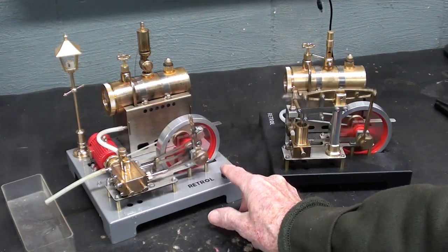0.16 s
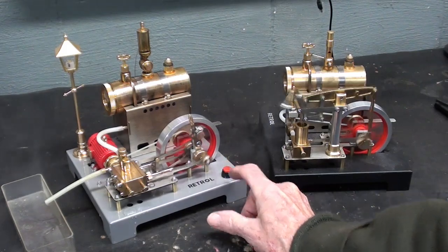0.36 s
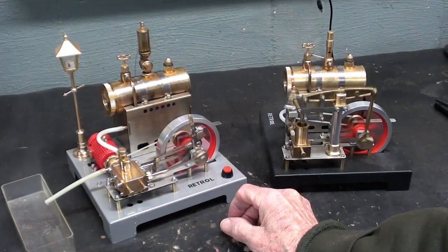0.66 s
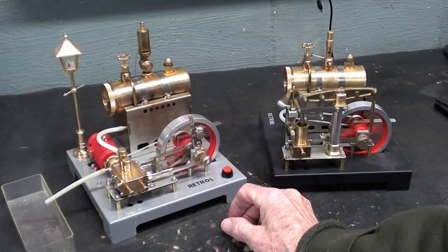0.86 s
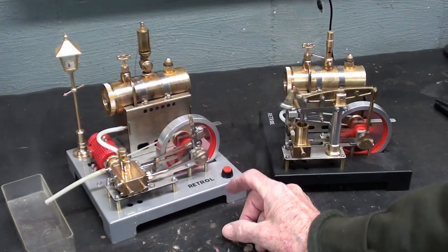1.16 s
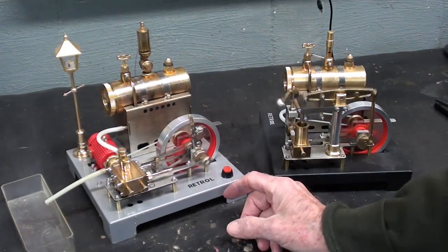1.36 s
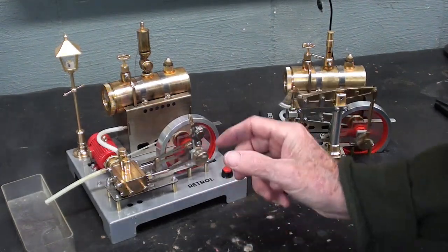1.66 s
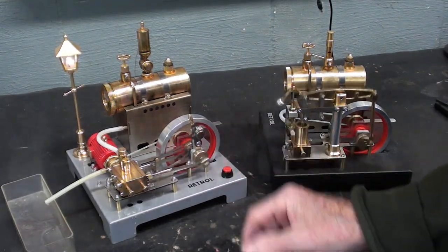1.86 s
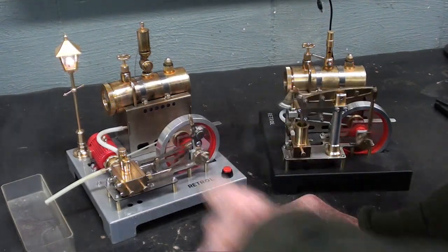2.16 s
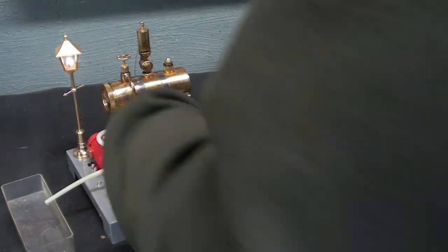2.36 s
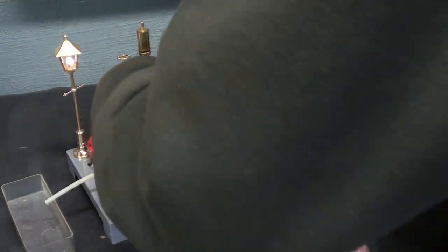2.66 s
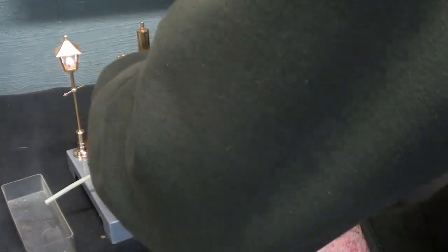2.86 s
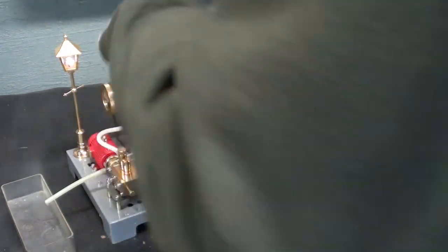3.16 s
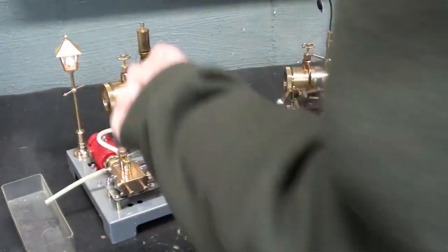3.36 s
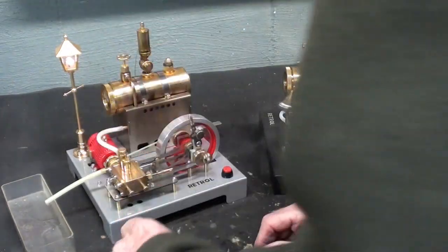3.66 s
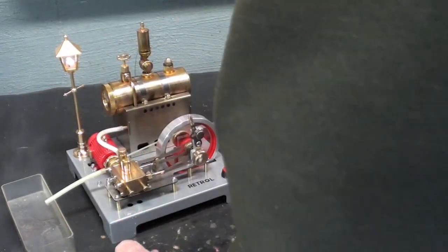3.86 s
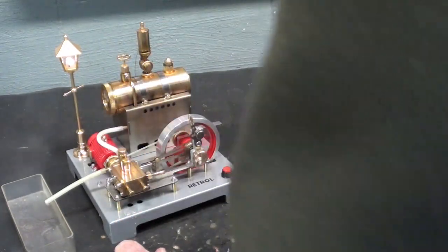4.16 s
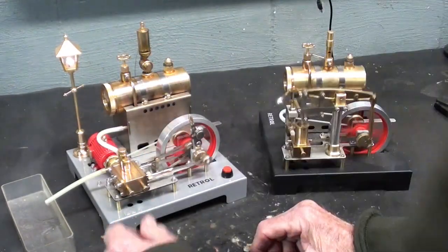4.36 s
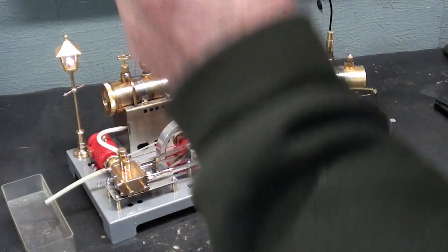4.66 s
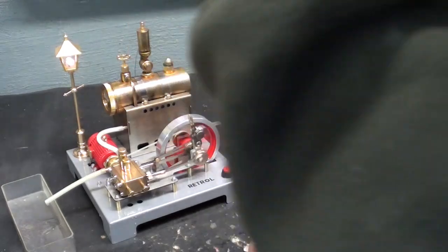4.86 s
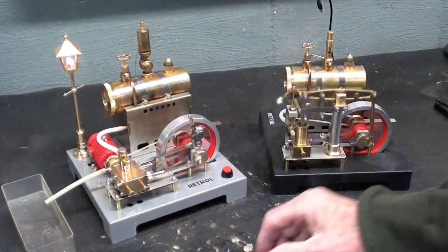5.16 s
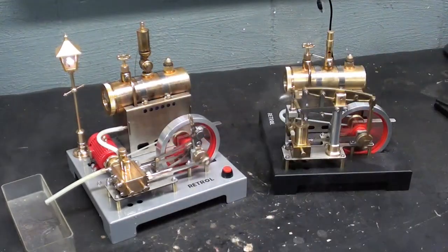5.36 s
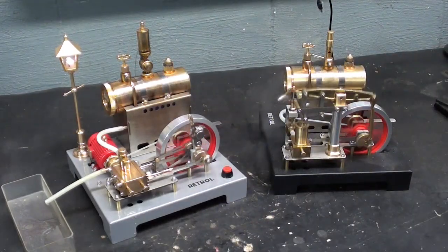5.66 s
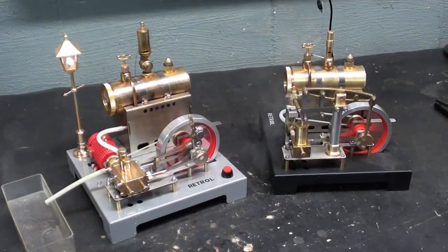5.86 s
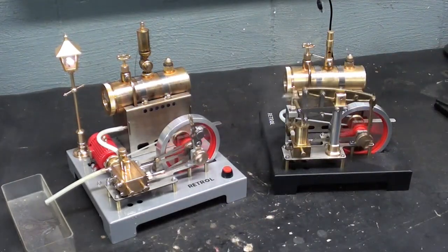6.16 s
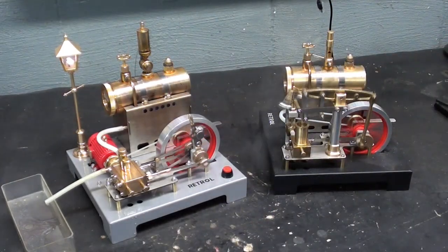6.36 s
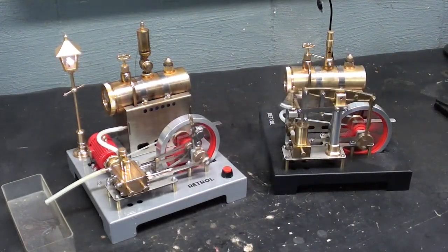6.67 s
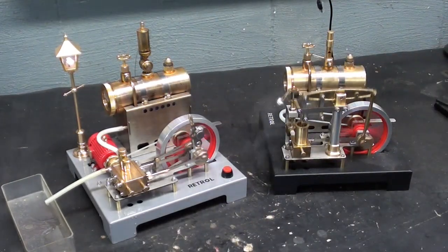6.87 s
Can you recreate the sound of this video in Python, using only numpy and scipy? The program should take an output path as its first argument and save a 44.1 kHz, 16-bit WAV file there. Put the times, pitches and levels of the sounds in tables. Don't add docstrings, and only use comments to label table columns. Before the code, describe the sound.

Close, nearly mono camera microphone in a dry workshop: a small brass steam engine runs throughout, knocking about eight times a second and slowing slightly. Each turn gives a hard metallic knock, chattering plate and rods, a dull bench boom and a softer valve tick. Thin leaking steam hisses above, muffled mid-way as an arm passes, then brightening again. Fingers tap metal fittings now and then; a tiny squeak comes near the end.

```python
import sys
import numpy as np
from scipy import signal
from scipy.fft import rfft, irfft
from scipy.io import wavfile
from scipy.ndimage import uniform_filter1d

SR = 44100
rng = np.random.default_rng(int(sys.argv[2]) if len(sys.argv) > 2 else 0)


def int16_out(signal):
    q = np.round(np.clip(np.atleast_2d(signal).T, -1, 1) * 32767)
    wavfile.write(sys.argv[1], SR, q.astype(np.int16))


def voltage_ratio(decibels):
    exponent = np.asarray(decibels, float) / 20
    return 10 ** exponent


N = 309582

# centre_hz, width_hz, level_db
PLATE_MODES = [(866, 58, -1), (977, 47, -2.5), (1149.7, 44, 2.5), (1434, 52, -4.5), (1610, 45, -3.5),
               (1957, 43, -4.5), (2294, 63, -7.5)]
# centre_hz, width_hz, level_db
LINK_MODES = [(2992, 120, -0.5), (3280, 67, 2.5), (3475, 65, -3.5), (4046, 81, -3), (4650, 380, -7.5),
              (5540, 1030, -16.5)]
# centre_hz, width_hz, level_db
BENCH_MODES = [(226, 47, -4.5), (234, 21.7, 0), (281.5, 12, 6.5), (323.7, 7.2, 0.5), (378.3, 12, 2.5),
               (448, 14.4, -5), (486, 13, -6), (604, 20, -7.5)]
# centre_hz, width_hz, level_db
NOZZLE_MODES = [(8390, 90, -5), (8850, 170, 0), (9100, 250, -5), (6650, 200, -9)]


def unit(x):
    return x / np.sqrt(np.mean(x ** 2))


def ring(x, modes):
    total = 0
    for k, (hz, width, db) in enumerate(modes):
        resonance = signal.iirpeak(hz, hz / width, fs=SR)
        total = total + (-1) ** k * voltage_ratio(db) * signal.lfilter(*resonance, x)
    return total


def colour(x, points):
    hz, db = np.transpose(points)
    f = np.fft.rfftfreq(N, 1 / SR) + 1
    return irfft(rfft(x) * voltage_ratio(np.interp(np.log(f), np.log(hz), db)), N)


def below(x, hz):
    return signal.sosfiltfilt(signal.butter(7, hz, fs=SR, output="sos"), x)


def walk(rate):
    hold = int(SR / rate)
    steps = np.repeat(rng.standard_normal(N // hold + 1), hold)
    return 1.77 * uniform_filter1d(uniform_filter1d(steps, hold), hold)[:N]


def swell(s, db, rise, fall):
    lead = SR // 4
    t = np.arange(lead) / SR
    shape = (1 - np.exp(-t / rise)) ** 2 * np.exp(-t / fall)
    out = np.zeros(N + 3 * lead)
    starts = np.clip((s * SR).astype(int) + lead, 0, N + lead)
    gains = np.broadcast_to(voltage_ratio(db) / shape.max(), s.shape)
    for start, gain in zip(starts, gains):
        out[start:start + lead] += gain * shape
    return out[lead:lead + N]


def grit(rate, spread_db):
    hit = rng.random(N) < rate / SR
    size, sign = rng.exponential(size=N), rng.standard_normal(N)
    return unit(hit * sign * voltage_ratio(spread_db * np.minimum(size, 2)))


def struck(envelope, modes, rate, spread_db):
    force = grit(rate, spread_db)
    return ring(force * envelope, modes) / np.std(ring(force, modes))


def blow(s, db, modes, soft):
    return ring(ring(swell(s, db, soft / 2, soft), modes), modes)


def curve(layer, s=None):
    # time_s, level_db
    effort = [(0, -7), (.4, -1.5), (.75, 1.5), (1.4, 2), (2.2, 1.5), (2.5, 0), (3.5, -2), (4.2, -1),
              (5.1, -0.5), (5.5, -1), (5.9, 1), (6.3, -1.5), (7.02, -2.5)]
    # time_s, upper_hiss_db
    shade = [(0, -5), (.6, -3), (.9, -2.3), (1.15, -2), (1.45, 1.5), (1.65, -2.2), (2.2, 0), (2.36, -3),
             (2.48, -11), (3.15, -9.5), (3.5, -3), (4.2, -6.5), (4.45, 0.5), (4.75, -7.5), (5.1, 3.5),
             (5.62, 0.2), (6.1, 0), (7.02, 3)]
    s = np.arange(N) / SR if s is None else s
    level_db, effort_share, shade_share = layer
    effort_db = np.interp(s, *np.transpose(effort))
    shade_db = np.interp(s, *np.transpose(shade))
    return level_db + effort_share * effort_db + shade_share * shade_db


def turns():
    # time_s, turns_done
    flywheel = [(-0.012, -1), (0.3565, 2), (1.8661, 14), (2.255, 17), (2.6598, 20), (3.0739, 23),
                (3.6373, 27), (4.3501, 32), (4.4992, 33), (5.6472, 41), (6.9516, 50)]
    # time_s, knock_peak_db, chatter_db (against the usual)
    odd_strokes = [(0.109, -18, -3), (0.2336, -15, -0.5), (0.3561, -25, -3.5), (0.4843, -18.5, -1.5),
                   (0.9845, -10.5, 0), (1.2356, -12.5, -2), (1.3625, -12, 1.5), (1.4875, -20.5, 1.5),
                   (1.613, -17.5, 0.8), (1.8671, -15, 0.7), (2.1243, -10.5, -3), (2.9356, -15.5, 0),
                   (3.6384, -19, 2), (3.7785, -16.5, 1.5), (3.924, -30, -3.5), (4.2079, -22, -0.7),
                   (4.35, -15.5, -1), (4.5022, -16.5, 0.5), (4.642, -12, -1.1), (4.7848, -18, -1),
                   (5.0712, -15, 0.5), (5.2186, -19.5, -1.5), (5.3588, -13, 0), (5.7923, -12.5, -0.3),
                   (6.0853, -19.5, 0), (6.2239, -19.5, 1), (6.6617, -21.5, -0.5), (6.806, -19, -2.5)]
    marks, done = np.transpose(flywheel)
    s = np.interp(np.arange(done[0], done[-1] + 1), done, marks)
    db = curve((-15.5, 2.2, 0.14), s)
    chatter = curve((-26, 0.3, 0.033), s)
    links = curve((-31, 1, 0.29), s)
    crack = curve((-31, 1, 0.44), s)
    boom = curve((-33, 0.5, 0.079), s)
    odd_s, odd_db, odd_chatter = np.transpose(odd_strokes)
    odd = np.abs(s[:, None] - odd_s).argmin(axis=0)
    s[odd], db[odd] = odd_s, odd_db
    chatter[odd] += odd_chatter
    return s, db, chatter - db, links - db, crack - db, boom - db


def load():
    return 0.74 + swell(turns()[0], -2, 0.0022, 0.027)


def shop():
    # frequency_hz, density_db (per Hz)
    rumble = [(15, -67), (25, -31), (70, -11), (99, -23), (123, -5), (189, -7.5), (279, 2), (303, -0.5),
              (344, -2.5), (384, -13), (461, -2), (537, -22), (700, -5), (910, -38), (1540, -120)]
    noise = unit(colour(rng.standard_normal(N), rumble))
    return noise * voltage_ratio(-44 + 0.6 * walk(20)) * load()


def rustle():
    # frequency_hz, density_db (per Hz)
    friction = [(290, -24), (500, -11.5), (769, -16), (868, -0.5), (1040, -9.5), (1140, -5.5), (1280, -11),
                (1610, -6), (2710, -12.5), (3300, -10), (7000, -18.5), (9100, -54), (15400, -120)]
    # time_s, pitch_hz, level_db
    bearing = [(6.84, 6330, -61), (6.858, 6380, -50), (6.871, 6330, -51), (6.876, 6030, -53),
               (6.94, 6010, -52), (6.975, 5980, -61)]
    # centre_hz, width_hz, level_db
    guide_modes = [(3210, 260, -3), (1170, 67, -8), (850, 76, -1)]
    scrape_db = curve((-43.5, 0.22, 0.26))
    noise = rng.standard_normal(N) + 0.38 * grit(800, 0.7)
    scrape = unit(colour(noise, friction)) * voltage_ratio(scrape_db + 4.0 + 1.15 * walk(30))
    s, hz, db = np.transpose(bearing)
    t = np.arange(N) / SR
    phase = 2 * np.pi * np.cumsum(np.interp(t, s, hz)) / SR
    squeak = np.sin(phase) * voltage_ratio(np.interp(t, s, db, -99, -99) + 1.5 * walk(90) + 4.0)
    guide = struck(voltage_ratio(scrape_db - 12 + 1.1 * walk(25)), guide_modes, 2500, 1.7)
    return (scrape + guide) * load() + squeak


def steam():
    # frequency_hz, density_db (per Hz)
    jet = [(5000, -36), (6300, -15.5), (7300, -2.5), (9200, -1), (10000, 5), (10900, 10), (11700, 2),
           (12600, -4), (14200, -12), (15600, -10.5), (16500, -30)]
    leak = colour(rng.standard_normal(N) + 0.25 * grit(590, 6.5), jet)
    low, middle = below(leak, 9300), below(leak, 12300)
    bands = unit(low) * voltage_ratio(curve((-45.5, 0.14, 0.39)))
    bands += unit(middle - low) * voltage_ratio(curve((-44, 0.1, 0.63)) - 2.0)
    bands += unit(leak - middle) * voltage_ratio(curve((-52.5, 0.1, 0.52)) + 0.5)
    tone = unit(ring(ring(rng.standard_normal(N), NOZZLE_MODES), [(8440, 2100, 0)]))
    whistle = tone * voltage_ratio(-50.5 + 2.7 * walk(8.3)) * load() ** 1.3
    return bands * voltage_ratio(1.0 * walk(25)) + whistle


def taps():
    # start_s, peak_db, centre_hz, plate_db, bench_db
    contacts = [(0.1143, -18, 8650, -24, -34), (0.287, -21, 10100, -32, -60), (0.424, -25, 8870, -51, -52),
                (1.3103, -16, 10500, -19, -32), (1.9215, -18.5, 7600, -30.5, -22),
                (1.948, -40, 8200, -42, -29.5), (3.813, -31, 9700, -26.5, -22.5),
                (4.352, -32, 9150, -44, -31), (5.1005, -18.5, 10100, -23, -24),
                (5.579, -35, 10100, -42, -48), (5.603, -19.5, 12600, -40, -56),
                (6.877, -22, 8850, -23.5, -56)]
    # start_s, level_db
    rubs = [
        (1.365, -33),
        (1.41, -44),
        (1.44, -40),
    ]
    s, db, hz, plate_db, bench_db = np.transpose(contacts)
    noise = rng.standard_normal(N)
    click = np.zeros(N)
    for t, d, f in zip(s, db, hz):
        tone = unit(ring(ring(noise, [(f, 4000, 0)]), [(f, 4000, 0)]))
        click += swell(np.array([t, t + 0.006]), np.array([d - 5, d - 14]), 0.00083, 0.0019) * tone
    plate_modes = PLATE_MODES + [(715, 1900, -10), (2920, 1200, -8), (4840, 2100, -12)]
    plate = struck(swell(s - .001, plate_db + .5, 0.000079, 0.005), plate_modes, 12000, 0.52)
    thud_modes = BENCH_MODES + [(300, 105, 2.0), (445, 160, 6), (700, 350, -3)]
    thud = struck(swell(s - .002, bench_db - 7.0, 0.002, 0.018), thud_modes, 5000, 1.3)
    rub_modes = LINK_MODES + [(6470, 3500, -4), (2300, 2700, -2)]
    rub = struck(swell(*np.transpose(rubs), 0.012, 0.029), rub_modes, 11000, 1.3)
    return click + plate + thud + rub


def bench_boom(s, db, luck):
    # delay_s, top_db, legs_db
    pushes = [
        (.001, 3, -13),
        (.022, -8.5, 2.5),
        (.043, -6.5, 2),
        (.054, -27, -0.5),
        (.085, -10, -2.5),
    ]
    # centre_hz, width_hz, level_db
    leg_modes = [(101.7, 21, -2.5), (122.7, 71, 1), (149, 69, -2)]
    top, legs = np.zeros(N), np.zeros(N)
    for k, (late, top_db, leg_db) in enumerate(pushes):
        top += swell(s + late, db + top_db, 0.00052, 0.00059) * (-1) ** k
        legs += swell(s + late, -45 + 0.63 * luck + leg_db, 0.00044, 0.0013) * (-1) ** k
    shake = struck(swell(s, db - 6.0, 0.0053, 0.05), BENCH_MODES + leg_modes, 1500, 4.8)
    return voltage_ratio(15.5) * ring(top, BENCH_MODES) + voltage_ratio(7.5) * ring(legs, leg_modes) + shake


def crank_knock(s, db, chatter_db, back, luck):
    # centre_hz, width_hz, level_db
    crank_modes = [(1617, 70, 5), (1730, 110, -9), (1890, 98, 0)]
    # time_s, level_db
    seating = [(0, 1), (.6, -5), (1.4, 1.5), (2.3, 1), (6.0, 2.2), (7.02, -12)]
    seat_db = np.interp(s, *np.transpose(seating))
    knock = blow(s - .0015, db + 17.5, [(1603, 240, 0)], .00006)
    knock += blow(s + 0.002004, chatter_db + 32.5 + seat_db, [(1146, 55, 0)], .00009)
    knock += blow(s + .014, chatter_db + 22 + 1.4 * luck, [(859, 73, 0)], 0.00009)
    slack = swell(s - .0055, db - 21, .003, .003)
    knock += struck(slack, [(1600, 250, 0), (1150, 200, -4)], 9000, 1)
    crank = swell(s - .001, db - 10.0, 0.00042, 0.0098) + voltage_ratio(-40.5) * back
    return knock + struck(crank, crank_modes, 9000, 4.7)


def engine():
    # centre_hz, width_hz, level_db
    brass_modes = [(7200, 1600, 2.5), (8870, 1500, 7.5), (10100, 530, 8.5), (11700, 480, 6),
                   (13200, 410, 6.5), (13700, 1000, -6)]
    s, db, chatter, links, crack, bench = turns()
    turn = uniform_filter1d(np.diff(s, append=2 * s[-1] - s[-2]), size=5)
    luck = rng.standard_normal((len(s), 6)).T
    chatter_db = db + chatter
    links_db = db + links + 0.73 * luck[4]
    crack_db = db + crack + 0.73 * luck[5]
    back = swell(s + .54 * turn, 0.65 * luck[0], 0.0024, 0.0043)

    plate = swell(s, chatter_db - 3.0, 0.0013, 0.0077)
    plate += swell(s + 0.0085, chatter_db - 5.5, 0.0027, 0.02) + voltage_ratio(-38.0) * back

    rods = swell(s, links_db + 1.0, 0.00022, 0.0032) + swell(s + 0.0057, links_db - 4, 0.0017, 0.016)
    rods += swell(s + .455 * turn, -39.5 + luck[1], 0.00051, 0.0037) + voltage_ratio(-46.5) * back

    brass = swell(s + 0.00028, crack_db + 0.5, 0.00048, 0.0054)
    brass += swell(s + 0.0079, crack_db - 12, 0.0042, 0.01)

    valve_db = curve((-46.5, .2, 0.11), s)
    valve = swell(s + .515 * turn, valve_db + 13.0 + luck[2], 0.00028, 0.0024)

    sound = crank_knock(s, db, chatter_db, back, luck[0])
    sound += struck(plate, PLATE_MODES, 4000, 0.82)
    sound += struck(rods, LINK_MODES, 5000, 0.91)
    sound += struck(brass, brass_modes, 12000, 3.8)
    sound += struck(valve, brass_modes[:2] + NOZZLE_MODES, 27000, .6)
    return sound + bench_boom(s, db + bench, luck[3])


def scene():
    # frequency_hz, left_minus_right_db
    left_level = [(60, 0.5), (110, 0.5), (200, 1.0), (380, 1.0), (700, 2.0), (1290, 1.5), (2380, 0.5),
                  (4400, 0.0), (8120, 0.5), (15000, 0.0)]
    # frequency_hz, left_lead_rad
    left_lead = [(0, 0), (520, 0.15), (2580, 0.0), (15800, 0.0)]
    # time_s, left_minus_right_db
    drift = [(0, .5), (4.8, .5), (5.6, -.1), (7.02, -.2)]
    dry = engine() + taps() + steam() + rustle() + shop()
    t = np.arange(SR // 2) / SR
    t60_s = .12
    tails = rng.standard_normal((2, len(t))) * 1000. ** (-t / t60_s) * (t > .003)
    room = [signal.fftconvolve(dry, tail / np.linalg.norm(tail))[:N] for tail in tails]
    f = np.fft.rfftfreq(N, 1 / SR)
    tilt_db = np.interp(f, *np.transpose(left_level))
    tilt = voltage_ratio(tilt_db / 2) * np.exp(.5j * np.interp(f, *np.transpose(left_lead)))
    near = np.array([irfft(rfft(dry) * tilt, N), irfft(rfft(dry) / tilt, N)])
    drift_db = np.interp(np.arange(N) / SR, *np.transpose(drift))
    near = near * voltage_ratio(np.array([drift_db, -drift_db]) / 2)
    apart = voltage_ratio(-19) * below(steam(), 9100) + voltage_ratio(-30) * rustle() + voltage_ratio(-27) * shop()
    apart += voltage_ratio(-64) * unit(ring(rng.standard_normal(N), [(6500, 3800, 0)]))
    apart += voltage_ratio(-74) * unit(below(rng.standard_normal(N), 45))
    return near + voltage_ratio(-18) * np.array(room) + apart * np.array([[1], [-1]])


def top_cut(x):
    return signal.sosfilt(signal.butter(12, 16260, fs=SR, output="sos"), x)


def record(dry):
    high_pass = signal.butter(6, 97, "high", fs=SR, output="sos")
    bass_cut = signal.sosfilt(high_pass, dry) + 0.39 * below(dry, 70)
    rounded = np.tanh(1.798 * bass_cut) / 1.8
    low_pass = signal.ellip(11, .2, 80, 15640, fs=SR, output="sos")
    mix = signal.sosfilt(low_pass, rounded)
    return top_cut(mix)


dry = scene()
out = record(dry)
int16_out(out)
```